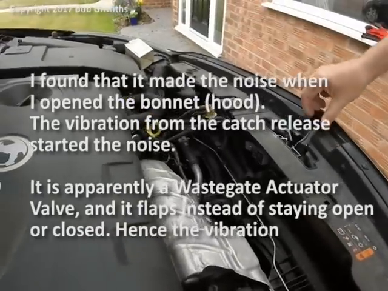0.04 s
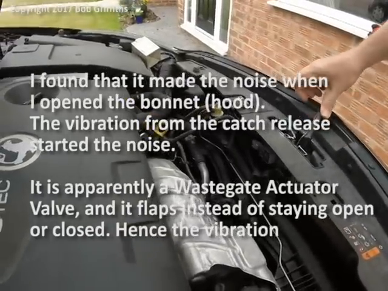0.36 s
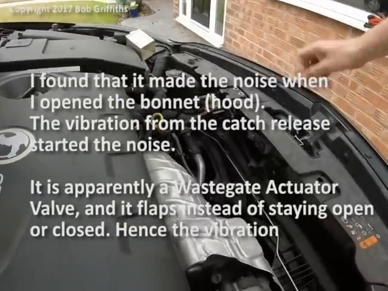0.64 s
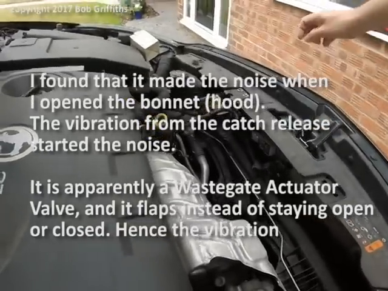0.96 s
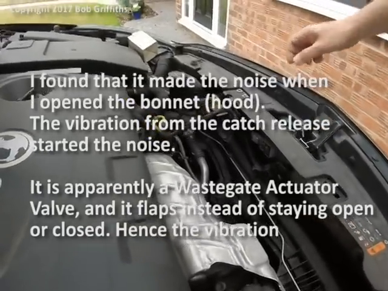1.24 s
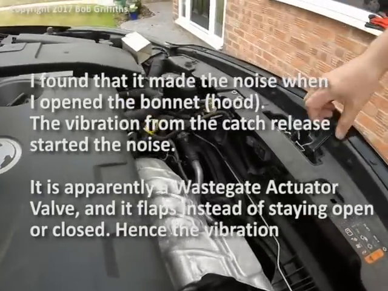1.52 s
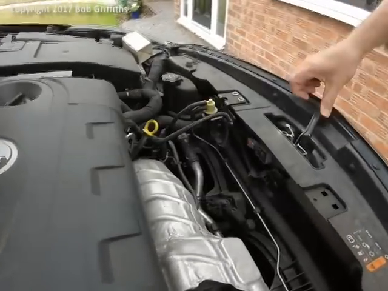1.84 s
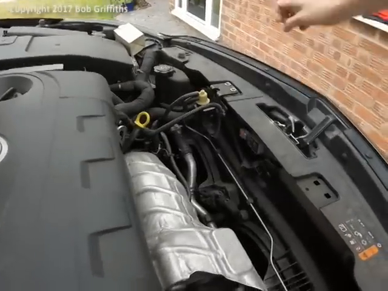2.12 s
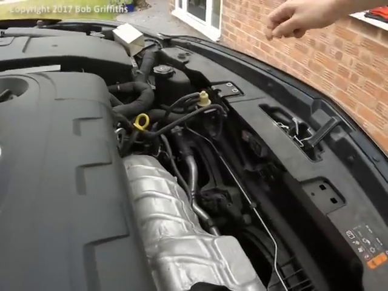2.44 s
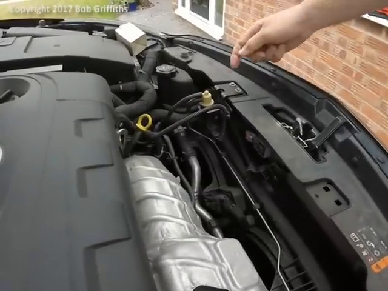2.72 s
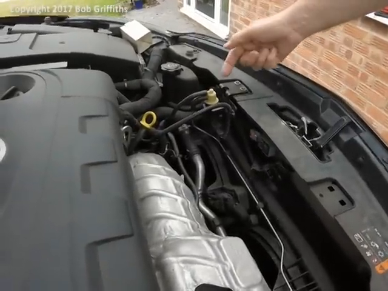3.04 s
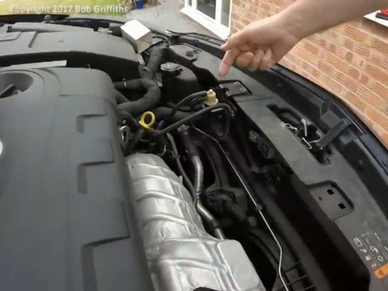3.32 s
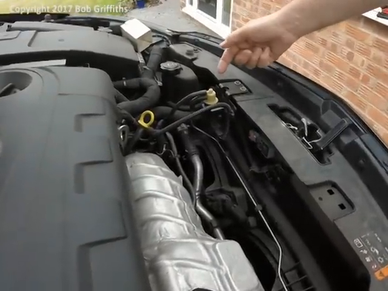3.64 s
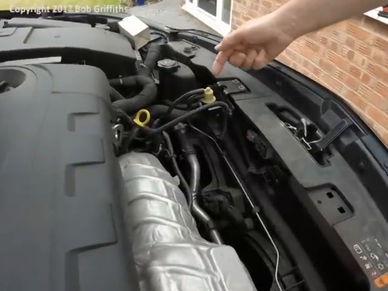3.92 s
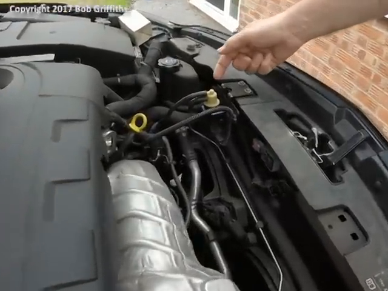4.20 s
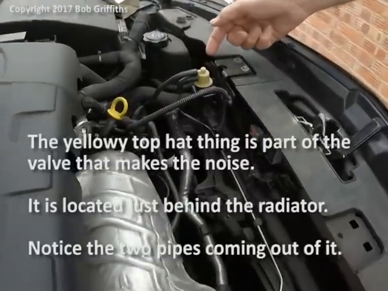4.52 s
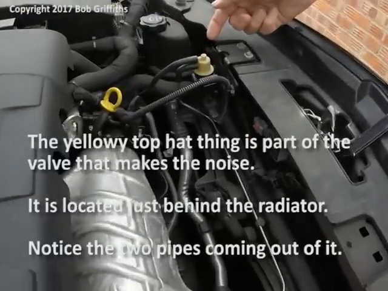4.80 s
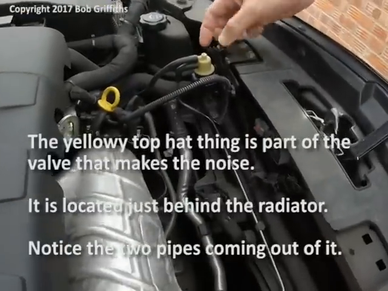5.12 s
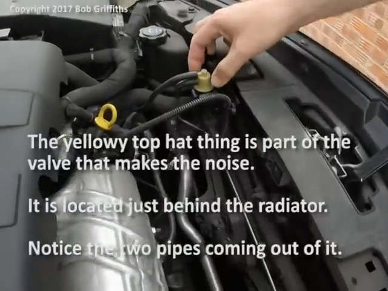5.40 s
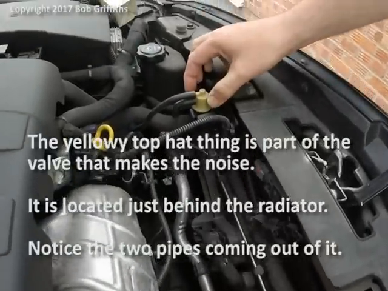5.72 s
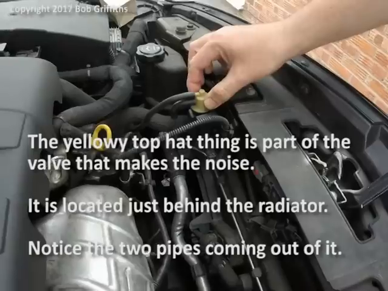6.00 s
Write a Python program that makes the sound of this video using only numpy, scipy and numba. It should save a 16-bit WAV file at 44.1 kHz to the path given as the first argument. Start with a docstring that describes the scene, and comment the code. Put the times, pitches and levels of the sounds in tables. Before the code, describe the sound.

Two loud, rattling clacks come from a car's bonnet catch, close to the microphone in a quiet yard. Between them a distant dove coos softly and a small bird chirps once. Just after the second clack, a valve in the engine bay starts vibrating with a continuous buzzing hum, changing colour slightly as a hand closes round it. A very faint high whine sits underneath.

```python
"""A quiet yard, microphone under the open bonnet of a car, engine stopped. The spring catch is pulled
and let go twice and clacks against the front panel. The second jolt sets a vacuum valve flapping about
120 times a second: a hum with a fine buzz, changing colour as the microphone leans in and a hand closes
round the valve. An actuator whines thinly, a small motor hums at first, and far off a dove coos and a
small bird chirps once."""
import sys
import numpy as np
from scipy import signal
from scipy.fft import rfft, irfft
from scipy.io import wavfile
from scipy.ndimage import uniform_filter1d
from numba import njit

SR = 44100
rng = np.random.default_rng(int(sys.argv[2]) if len(sys.argv) > 2 else 0)


def bounce(signal):
    """Save signal as a 16-bit WAV file at the path given by the first command-line argument."""
    frames = np.transpose(np.atleast_2d(signal))
    limited = np.clip(frames, -1, 1)
    pcm = np.round(limited * 32767).astype(np.int16)
    wavfile.write(sys.argv[1], SR, pcm)


N = 267069
T = np.arange(N) / SR
LOCK_S = 2.355  # the valve's flap reaches its seat and locks into a beat

# Releases of the catch: (time [s], level [dB], then offsets: slip off the finger [dB], rebound [dB],
# treble tilt [dB/octave], panel ring [dB], stop ring [dB])
CATCH_RELEASES = [(.6875, -3, -29, -4, -0.14, -1.5, -2), (2.055, -4, -18.5, -1.5, 0.15, .5, -14)]


def undb(db):
    return 10 ** (np.asarray(db) / 20)

def unit(x):
    return x / np.sqrt(np.mean(x ** 2))

def fade(t, t60):
    return np.exp(-np.log(1000) * t / t60)

def sine(hz):
    return np.sqrt(2) * np.sin(2 * np.pi * np.cumsum(hz) / SR)

def since(s):
    """Seconds gone by after a moment, 0 before it."""
    return np.maximum(T - s, 0)

def step(middle_s, length_s):
    """A smooth move from 0 to 1."""
    return .5 + .5 * np.sin(np.pi * np.clip((T - middle_s) / length_s, -.5, .5))

def arch(start_s, length_s):
    """A half sine that rises from 0 to 1 and falls back."""
    return np.sin(np.pi * np.clip((T - start_s) / length_s, 0, 1))

def curve(rows):
    """The columns of a timed table, joined by straight lines."""
    s, *columns = np.transpose(rows)
    return [np.interp(T, s, c) for c in columns]

def at(points, hz):
    """Read (Hz, value) points on a log-frequency axis."""
    f, value = np.transpose(points)
    return np.interp(np.log(hz + 1), np.log(f), value)

def colour(x, points):
    """Filter a sound by (Hz, dB) points."""
    return irfft(rfft(x) * undb(at(points, np.fft.rfftfreq(len(x), 1 / SR))), len(x))

def noise(points):
    return unit(colour(rng.standard_normal(N), points))

def walk(rate):
    """Smooth random drift with a spread of 1."""
    k = int(SR / rate)
    return unit(uniform_filter1d(np.repeat(rng.standard_normal(N // k + 1), k), k)[:N])

def struck(modes):
    """One second of ringing from (Hz, dB, t60 s) modes."""
    t = T[:SR]
    return sum(undb(db) * fade(t, t60) * np.sin(2 * np.pi * hz * t) for hz, db, t60 in modes)


def yard(hush_db=-54, rumble_db=-56):
    """Quiet outdoor air all round the car, over a wavering rumble."""
    # Outdoor hush: (frequency [Hz], relative density [dB])
    hush_spectrum = [(15, -31), (25, -11.5), (125, 0.5), (344, -9.5), (475, -4), (1060, -15.5), (4750, -27),
                     (5140, -30), (5880, -29), (6370, -29), (6900, -32.5), (15000, -46)]
    rumble = noise([(20, -17.5), (50, -2.5), (80, -10.5), (200, -29.5), (800, -60.5)])
    hush = undb(hush_db + walk(8.9)) * noise(hush_spectrum)
    return hush + undb(rumble_db + 2 * walk(3.2)) * rumble

def actuator(fade_s=.3):
    """A thin whine at multiples of the switching rate; its partials drop out one by one."""
    # Switching tones: (frequency [Hz], level [dB], middle of fade-out [s])
    partials = [(3750, -78.5, 1.0), (5000, -77.5, 1.6), (6250, -71, 5.55), (7500, -86, 3.2)]
    return sum(undb(db + 0.88 * walk(2.72)) * (1 - step(until_s, fade_s)) * sine(np.full(N, hz))
               for hz, db, until_s in partials)

def small_motor(stop_s=.65, t60_s=1.8, rush_db=-59.5):
    """A small motor's hum wavers with its speed, then dies away along with its rush."""
    # Motor hum: (frequency [Hz], level [dB])
    partials = [(306.5, -51), (609, -59.5)]
    speed = 1 + 0.0057 * walk(10)
    hum = sum(undb(db + 0.44 * walk(6.5)) * sine(hz * speed) for hz, db in partials)
    rush = noise([(60, -16), (150, -3.5), (400, -2.5), (650, 8), (900, -17.5), (3000, -16),
                  (8000, -33), (15000, -40)])
    return fade(since(stop_s), t60_s) * (hum + undb(rush_db) * rush)

def blow(tilt_db, ring_db, crack_db=2, crack_s=0.0048, echo_db=-36, echo_t60=0.46):
    """One metal contact: a crack, a dense rattle, the panel's modes, a faint echo off the house."""
    # Modes of the catch and its panel: (frequency [Hz], level [dB])
    panel_modes = [(135, -15), (172, -6.5), (259, -10.5), (293, -9.5), (360, -2), (440, 2), (478, 2),
                   (565, -16), (617, -21.5), (736, -6), (805, -14), (877, -17.5), (910, -14), (1135, -7.5),
                   (1210, -9.5), (1255, -10), (1378, -18.5), (1762, -4), (1818, -4), (1948, -5),
                   (2030, -10.5), (2638, -13.5), (2850, -13), (4230, -24.5), (5320, -22), (6440, -17.5),
                   (6735, -21.5)]
    # Their decay: (frequency [Hz], t60 [s])
    panel_decay = [(130, .42), (400, .17), (900, .135), (2000, .125), (7000, .09)]
    # Dense rattle: (frequency [Hz], relative density [dB])
    rattle_spectrum = [(40, -31.5), (100, -7.5), (170, -3.5), (400, 2), (600, 1), (1200, -3.5),
                       (2000, -8.5), (2800, -13.5), (3600, -20.5), (6300, -20), (9000, -25.5),
                       (12000, -34.5), (15500, -43.5)]
    # It dies sooner in the treble: (frequency [Hz], t60 [s])
    rattle_decay = [(60, 1), (170, 0.49), (400, 0.25), (1000, .15), (2500, 0.14), (6000, 0.094),
                    (14000, 0.065)]
    t = T[:SR * 3 // 4]
    edges = np.geomspace(40, 16000, 25)
    centres = np.sqrt(edges[1:] * edges[:-1])
    tilt = lambda hz: undb(tilt_db * np.log2(np.maximum(hz, 300) / 800))
    sizes = undb(at(rattle_spectrum, centres)) * np.sqrt(np.diff(edges))
    sizes = sizes / np.linalg.norm(sizes) * tilt(centres)
    hz = np.fft.rfftfreq(len(t), 1 / SR)
    hiss = np.exp(2j * np.pi * rng.random(len(hz)))
    echo = undb(echo_db) * fade(t, echo_t60)
    out = 0
    for lo, hi, centre, size in zip(edges, edges[1:], centres, sizes):
        band = unit(irfft(hiss * (hz >= lo) * (hz < hi), len(t)))
        crack = undb(crack_db) * np.exp(-t / crack_s) * centre / (centre + 600)
        rattle = undb(-5.5) * fade(t, at(rattle_decay, centre))
        out = out + size * band * (rattle + crack + echo)
    phases = rng.random(len(panel_modes))  # no two blows land on the same spot
    for (f, db), phase in zip(panel_modes, phases):
        envelope = undb(db + ring_db - 6) * tilt(f) * fade(t, at(panel_decay, f))
        out = out + envelope * np.sin(2 * np.pi * (f * t + phase))
    return out * (1 - np.exp(-t / 0.0019))

def catch():
    """Close by, the lever is gripped, pulled and snaps home; each blow feeds the panel's drum tone."""
    # Light touches of fingers and lever: (time [s], level [dB], treble tilt [dB/octave],
    # then offsets: panel ring [dB], drum tone [dB], lever ring [dB])
    touches = [(.205, -44.5, -4.5, 4.5, 8.5, -2), (.218, -44, -6, -7.5, 11.5, -16),
               (.549, -48.5, -1, -12.5, -14, -20.5), (.603, -40.5, -7, -2, -5, -20),
               (.615, -40.5, -3, 2.5, -8, -20.5), (.64, -44, -6, 2, -11, -19.5),
               (.766, -34, -3, -2, 17, -20), (1.782, -32.5, -.5, 0, 7.5, 1.5),
               (1.792, -38.5, -7, -6.5, 14, -4), (1.957, -32.5, -3, 1, -6.5, -17),
               (1.973, -36.5, -4, -1, -11, -19.5), (1.999, -41, -9, 1, 1.5, -20),
               (2.297, -49, -12.5, -4.5, -9, -20), (5.541, -53, 2, -16, -20, -21)]
    # The lever's own ring: (frequency [Hz], level [dB], t60 [s])
    lever_modes = [(1380, 0.5, 0.049), (2110, -14, 0.18), (2540, -16.5, 0.078)]
    # The panel's main drum tone: (frequency [Hz], level [dB], t60 [s])
    drum_mode = (398, -8, 0.18)
    drum_hz, drum_db, drum_t60 = drum_mode
    hits, swing = np.zeros((2, N + SR))
    lever = struck(lever_modes)
    for s, db, tilt_db, ring_db, push_db, lever_db in clack_blows() + list(touches):
        hit, start = blow(tilt_db, ring_db), int(s * SR)
        t, span = T[:len(hit)], slice(start, start + len(hit))
        hits[span] += undb(db) * (hit + undb(lever_db) * lever[:len(hit)])
        swing[span] += undb(db + push_db) * fade(t, drum_t60) * (1 - np.exp(-t / 0.0024))
    drum = undb(drum_db) * swing[:N] * sine(drum_hz * (1 + .004 * walk(52)))
    return hits[:N] + drum

def clack_blows(lead_s=.0135, slip_tilt_db=-4, slip_ring_db=-6, slip_drum_db=-14, lever_db=-14):
    """Every clack is a slip off the finger, a double landing and a double rebound."""
    # Contacts in a clack: (delay [s], level [dB], treble tilt [dB/octave], panel ring [dB], drum [dB])
    contacts = [(0, 0, 0.43, -2, -6.5), (.008, -5, 1, 2, 3.5), (.0258, -5, 0.84, 3.5, -12),
                (.0328, -5.5, 0.65, -2.5, 4.5)]
    blows = []
    for s, db, slip_db, rebound_db, bright_db, body_db, _ in CATCH_RELEASES:
        blows.append((s - lead_s, db + slip_db, slip_tilt_db, slip_ring_db, slip_drum_db, lever_db))
        for k, (delay, contact_db, tilt_db, ring_db, push_db) in enumerate(contacts):
            level_db = db + contact_db + rebound_db * (k >= 2)
            blows.append((s + delay, level_db, tilt_db + bright_db, ring_db + body_db, push_db, lever_db))
    return blows

def steel_stop(attack_s=.0007):
    """The first landing of each clack makes the steel stop ring briefly."""
    # Ring of the stop: (frequency [Hz], level [dB], t60 [s])
    stop_modes = [(986, 0, 0.027), (1230, -5, .04), (2768, -4, .03), (4190, -7, 0.032)]
    ring = struck(stop_modes) * (1 - np.exp(-T[:SR] / attack_s))
    out = np.zeros(N + SR)
    for s, db, *_, stop_db in CATCH_RELEASES:
        start = int(s * SR)
        out[start:start + SR] += undb(db + stop_db) * ring
    return out[:N]

def dove():
    """Far off, a dove coos in nearly pure, gliding tones."""
    # Coos: (start [s], length [s], pitch [Hz], glide [Hz/s], level [dB])
    coos = [(0.916, 0.18, 545, -330, -56), (1.621, .17, 499, 90, -49.5), (1.8, .15, 492, -40, -57.5)]
    out = 0
    for s, length, hz, glide, db in coos:
        pitch = (hz + glide * np.minimum(since(s), length)) * (1 + 0.0085 * walk(47))
        out = out + undb(db + 1.4 * walk(30)) * arch(s, length) * sine(pitch)
    return out

def small_bird():
    """One distant chirp with its octave, rising and falling in pitch."""
    # The call: (start [s], length [s], pitch [Hz], rise at its middle [Hz], level [dB])
    chirp = (.966, .045, 1950, 240, -64)
    s, length, hz, rise_hz, db = chirp
    swell = arch(s, length)
    pitch = hz + rise_hz * swell
    return undb(db) * swell * (sine(pitch) + 0.53 * sine(2 * pitch))

def panel_flex(start_s=1.93, level_db=-33, attack_s=0.034, t60_s=0.7):
    """The panel flexes under the second pull with a low rumble."""
    bend = np.minimum(since(start_s) / attack_s, 1) * fade(since(start_s + attack_s), t60_s)
    rumble = noise([(20, -2.5), (50, 0), (130, -2), (270, 0.5), (450, -14), (1200, -59.5)])
    return undb(level_db) * bend * rumble

def valve(swing_s=2.18, swing_db=-33, rise_s=.12, graze_db=-13,
          first_stroke_db=-9, grow_s=0.14, throb_db=2.5, throb_decay_s=.3):
    """The jolted flap swings freely, then beats on its seat with a stroke that grows and throbs."""
    phase = np.cumsum(flap_rate()) / SR
    near = step(middle_s=4.37, length_s=0.84)  # the microphone leans in
    held = step(middle_s=5.31, length_s=.3)  # a hand closes round the valve
    seated = step(LOCK_S, .03)
    free = np.minimum(since(swing_s) / rise_s, 1) * (1 - seated)
    surge_db = throb_db * np.exp(-since(LOCK_S) / throb_decay_s) * np.sin(hunting())
    stroke = seated * undb(first_stroke_db * np.exp(-since(LOCK_S) / grow_s) + surge_db)
    swing = undb(swing_db) * free * np.sqrt(2) * np.sin(2 * np.pi * phase)
    hum = hose_hum(phase, near, held)
    buzz = seat_buzz(phase, near, held)
    return swing + stroke * hum + (stroke + undb(graze_db) * free) * buzz

def flap_rate(swing_hz=105.8, beat_hz=120.84, sag_hz_per_s=.16,
              hunt_hz=7.9, hunt_decay_s=0.15, falter_s=0.0104):
    """Flaps per second: a slow free swing, then a faster beat that hunts, settles and slowly sags."""
    # The flap falters for a cycle or two under the fingers: (time [s], change of rate [Hz])
    falters = [(5.401, 4.5), (5.683, -6), (5.895, 3.5)]
    hunt = hunt_hz * np.exp(-since(LOCK_S) / hunt_decay_s) * np.cos(hunting())
    slips = sum(step_hz * np.exp(-((T - s) / falter_s) ** 2) for s, step_hz in falters)
    locked = beat_hz - sag_hz_per_s * since(LOCK_S) + hunt + slips
    return np.where(T < LOCK_S, swing_hz, locked) * (1 + .0015 * walk(60))

def hunting(peak_s=2.425, period_s=.0765):
    """Angle of the surge in rate and stroke that follows the lock."""
    return 2 * np.pi * (T - peak_s) / period_s

def seat_buzz(phase, near, held, tick_db=-52.5, air_db=-56, puff_depth=0.43, hand_db=-6):
    """Each cycle the flap ticks, lets out a puff and rings the valve's body, which the hand damps."""
    # Escaping air: (frequency [Hz], relative density [dB])
    air_spectrum = [(100, -8), (300, -5), (520, -5), (900, -14.5), (2000, -11), (3000, -21), (6000, -23.5),
                    (9000, -35), (15000, -46)]
    # The microphone passes over the valve: (time [s], level [dB], tick treble above 4 kHz [dB])
    microphone_pass = [(2.6, -2.5, -7), (3.1, -3.5, -8), (3.4, -3.5, -2), (4.1, -1.5, -1.5),
                       (4.9, -5, -2.5), (5.45, -2.5, -7.5), (6.06, -7, -7.5)]
    buzz_db, sharp_db = curve(microphone_pass)
    pulses = seat_pulses(phase)
    air = noise(air_spectrum) * (1 + puff_depth * np.cos(2 * np.pi * phase))
    ring = undb(hand_db * held) * body_ring(pulses, near)
    ticks = undb(tick_db) * seat_ticks(pulses, sharp_db)
    return undb(buzz_db) * (ticks + ring + undb(air_db) * air)

def seat_pulses(phase, spread_db=1.5):
    """One impulse at each closing of the flap, each a little different in strength."""
    closings = np.interp(np.arange(1, int(phase[-1])), phase, np.arange(N))
    taps = closings.astype(int)[:, None] + np.arange(-7, 9)
    sizes = undb(spread_db * rng.standard_normal((len(closings), 1)))
    impulses = sizes * np.sinc(taps - closings[:, None])  # placed between samples
    return np.bincount(np.clip(taps, 0, N - 1).ravel(), impulses.ravel(), N)

def seat_ticks(pulses, sharp_db, travel_s=0.688):
    """Ticks ring the shell and bounce through the bay; the paths change as the microphone moves."""
    # Resonances of the plastic shell: (frequency [Hz], width [Hz], relative level [dB])
    shell_modes = [(1280, 130, 3), (1500, 360, -2), (1887, 436, 3.5), (2390, 110, -8), (2790, 170, -15.5),
                   (3390, 480, -12), (4160, 230, -12), (4850, 300, -21), (5060, 650, -13), (5810, 140, -25),
                   (6590, 100, -19), (7370, 250, -25.5), (8120, 240, -22), (8950, 420, -27),
                   (10800, 970, -28.5)]
    # The seat's bare tick: (frequency [Hz], relative density [dB])
    tick_spectrum = [(820, -27), (950, 4.5), (2000, -15), (4000, -22), (7000, -28), (11000, -38),
                     (15000, -44)]
    t, out = T[:SR // 12], 0
    hz = np.fft.rfftfreq(len(t), 1 / SR)
    shell = sum(undb(db) ** 2 / (1 + (2 * (hz - f) / width) ** 4) for f, width, db in shell_modes)
    shape = np.sqrt(shell + undb(at(tick_spectrum, hz)) ** 2)
    evenness = at([(1500, .95), (4000, .5)], hz)  # 1 would flatten the bay's peaks and dips
    bay = fade(t, t60=.075)
    for place in range(3, 10):
        paths = rfft(rng.standard_normal(len(t)) * bay)
        paths = shape * paths / np.abs(paths) ** evenness
        response = unit(np.roll(irfft(paths, len(t)), SR // 200))
        share = np.cos(np.pi / 2 * np.clip(T / travel_s - place, -1, 1))
        out = out + share * signal.fftconvolve(pulses, response)[:N]
    out = unit(out)
    treble = colour(out, [(2500, -30), (4000, 0)])
    return out + (undb(sharp_db) - 1) * treble

def body_ring(pulses, near, width_hz=30, swell_db=5):
    """Uneven ticks keep the valve's body ringing in thin partials that swell and fade."""
    # Body modes: (frequency [Hz], level from afar [dB], level close up [dB])
    body_modes = [(1206, -63, -60), (2772, -70, -77), (3252, -78, -69), (3492, -70, -64), (4460, -70, -73),
                  (5298, -81, -72), (6022, -76, -75), (6386, -76, -78), (8070, -79, -84)]
    knocks = pulses * (1 + .3 * walk(120))
    out = 0
    for hz, far_db, near_db in body_modes:
        ring = unit(signal.lfilter(*signal.iirpeak(hz, hz / width_hz, fs=SR), knocks))
        out = out + ring * undb(far_db + (near_db - far_db) * near + swell_db * np.tanh(walk(3.5)))
    return out

def hose_hum(phase, near, held):
    """The flap pumps air in the hoses; higher partials arrive later and waver more."""
    # Harmonics, lowest first: (level from afar [dB], level close up [dB], change under the hand [dB])
    harmonics = [(-30.5, -30.5, -0.5), (-45, -42, -0.5), (-47, -49.5, 4), (-39, -44, -2), (-53, -40, -3),
                 (-53.5, -51.5, -4), (-58.5, -70.5, 6)]
    hum = 0
    for k, (far_db, near_db, hand_db) in enumerate(harmonics, 1):
        size = undb(far_db) * (1 - near) + undb(near_db) * near
        waver_db = 0.061 * k * walk(22) + 0.3 * k * walk(2.56)
        partial = np.sqrt(2) * np.sin(2 * np.pi * k * phase - k * k * np.pi / 5)
        hum = hum + size * undb(hand_db * held + waver_db) * partial
    return hum


def scene():
    """One microphone: the engine bay close up, the birds and the yard behind."""
    engine_bay = catch() + panel_flex() + steel_stop() + valve() + actuator() + small_motor()
    return (engine_bay + dove() + small_bird() + yard())[None]

@njit
def follow(x, attack, release):
    """Envelope that rises fast and falls slowly."""
    out, level = np.empty(len(x)), 0.
    for i in range(len(x)):
        level += (x[i] - level) * (attack if x[i] > level else release)
        out[i] = level
    return out

def record(dry, knee_db=-17, attack_s=0.014, release_s=0.26, squeeze=0.56, top_hz=15100):
    """The recorder's gain control ducks after the clacks, their first peaks clip, and the top is cut."""
    loud = follow(np.abs(dry[0]), 1 / (attack_s * SR), 1 / (release_s * SR))
    gain = (1 + (loud / undb(knee_db)) ** 2) ** (-squeeze / 2)
    fade_out = np.minimum((T[-1] - T) / .004, 1)
    wet = np.clip(dry * gain, -1, 1) * fade_out
    return signal.sosfilt(signal.ellip(8, .2, 70, top_hz, fs=SR, output="sos"), wet)


dry = scene()
out = record(dry)
bounce(out)
```